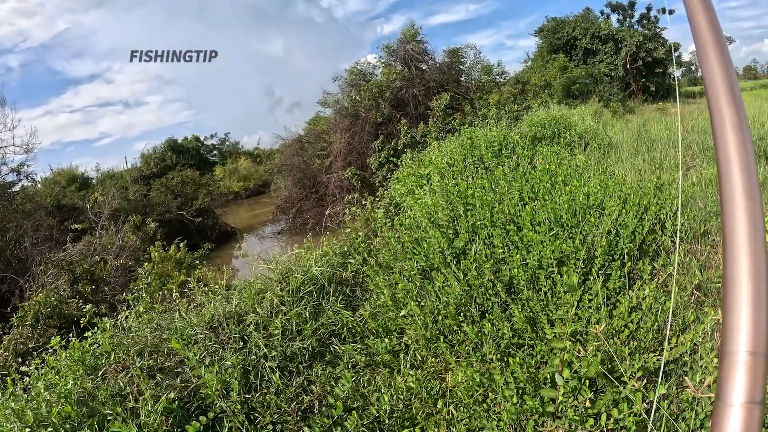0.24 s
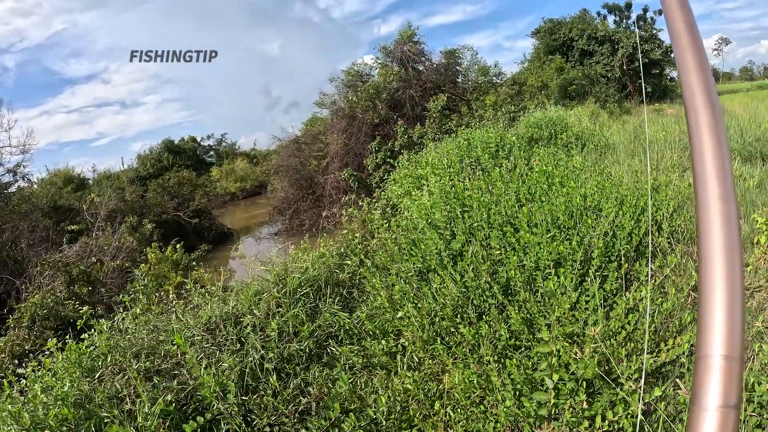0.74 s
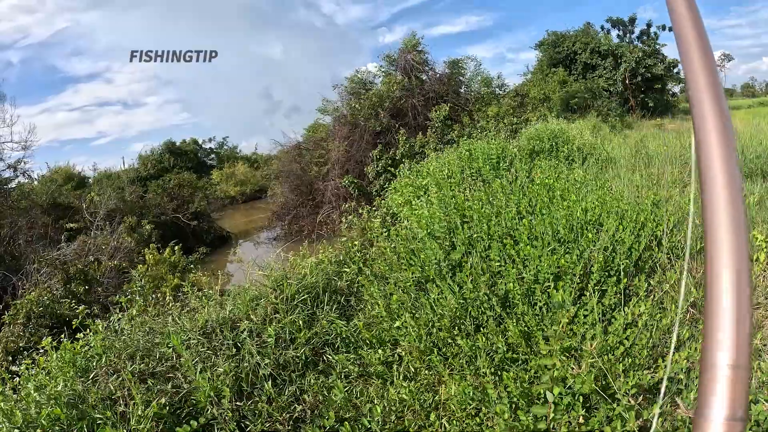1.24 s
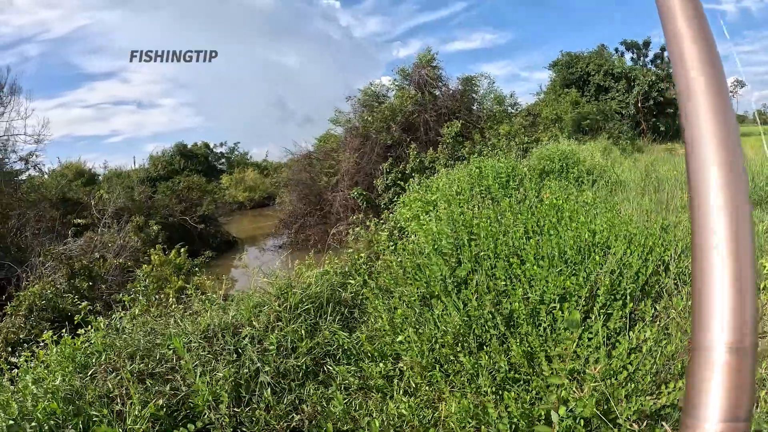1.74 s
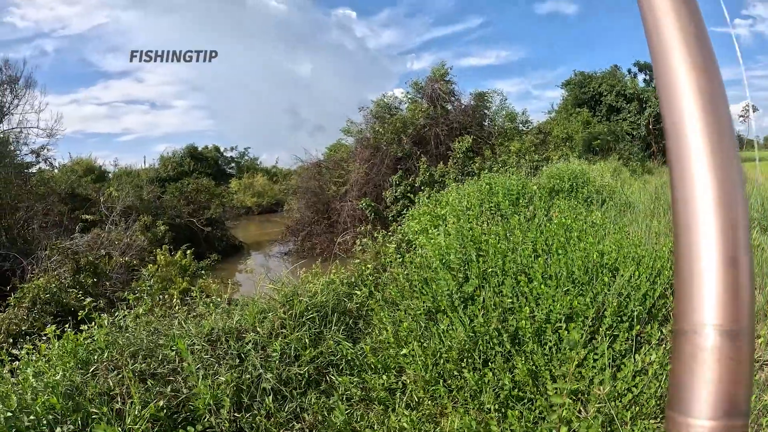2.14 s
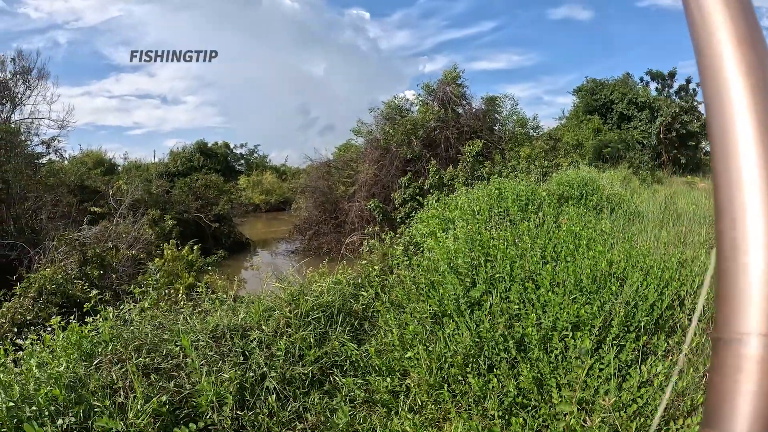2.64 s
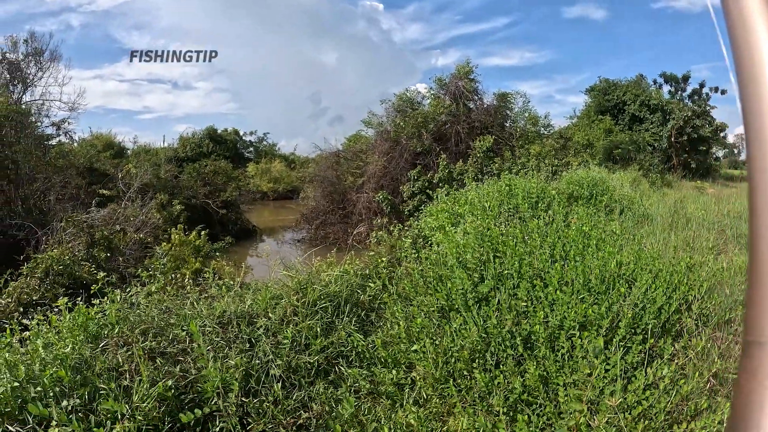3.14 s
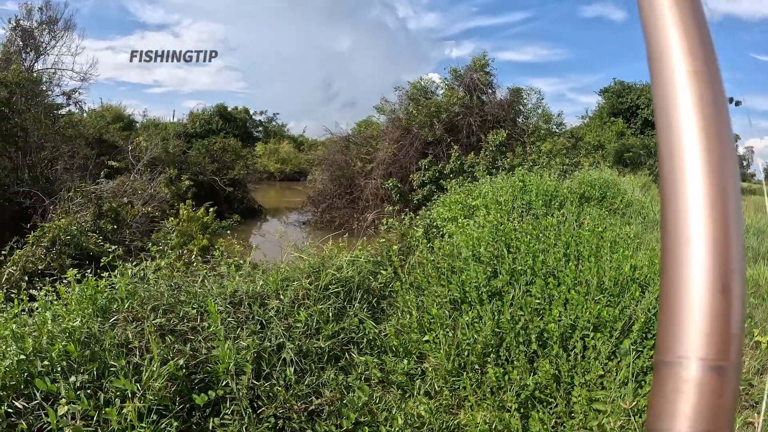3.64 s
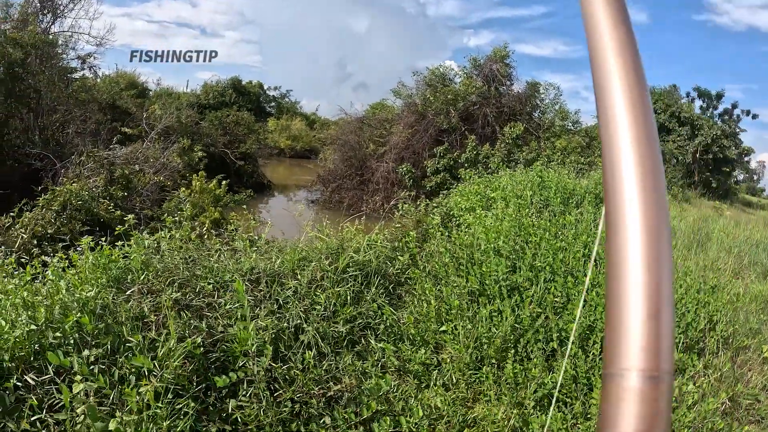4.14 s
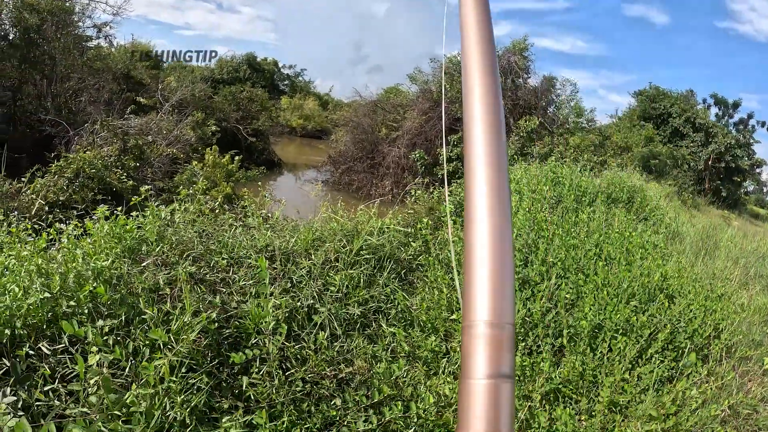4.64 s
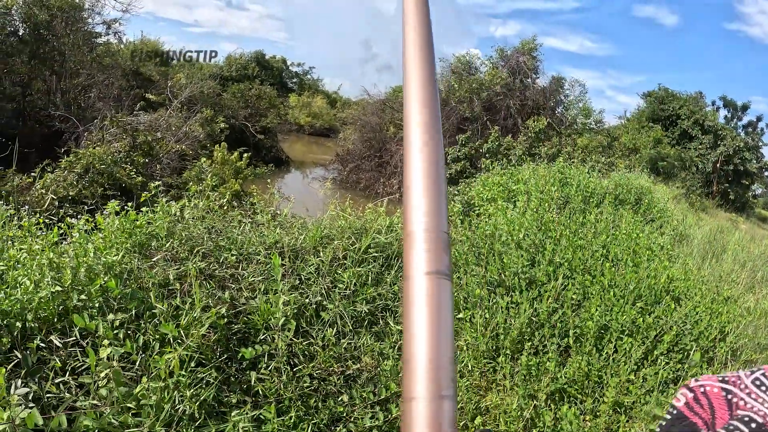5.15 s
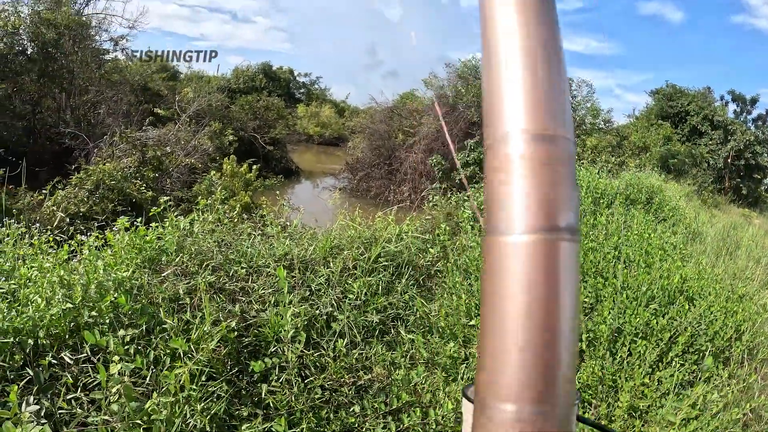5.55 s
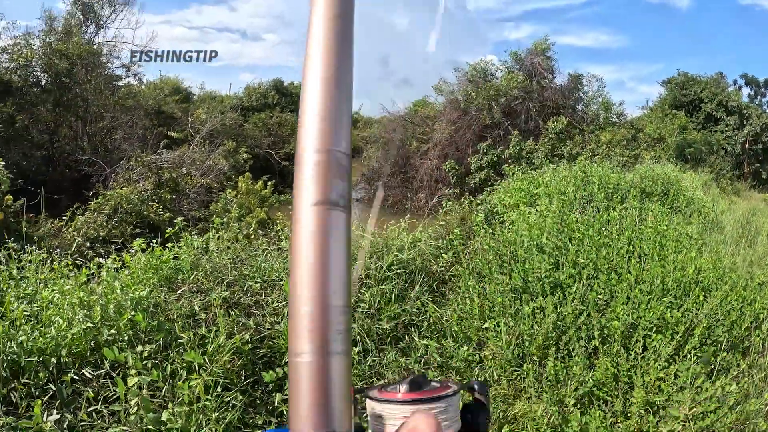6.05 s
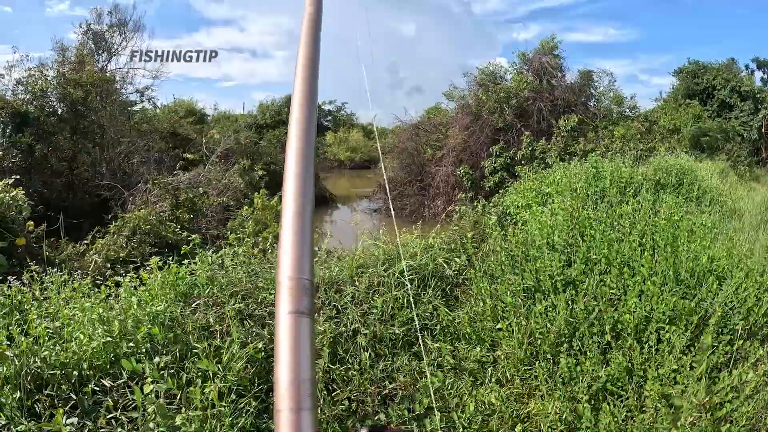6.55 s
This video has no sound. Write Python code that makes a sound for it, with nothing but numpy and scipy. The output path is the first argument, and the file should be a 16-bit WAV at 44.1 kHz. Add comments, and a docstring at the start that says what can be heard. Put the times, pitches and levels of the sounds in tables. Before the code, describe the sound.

Outdoors by a pond, close stereo microphone. Low wind rumbles and thumps, strongest near one and three seconds, above a faint wavering deep hum. A fishing reel hisses and whirrs unevenly, with dull knocks of rod and handle and one hard click at two seconds. From about 3.7 seconds bright metallic clicks come irregularly, several each second, to nearly five; then more scattered clacks, small squeaks and thin line scrapes.

```python
"""Beside a pond, a spinning reel is cranked close to two microphone ports. Far off a low hum wavers
(gliding partials); gusts of wind buffet the microphone (coloured noise, bandpassed lumps, short thumps).
Handle and rod knock, rubbing parts squeak and scrape, loose metal clicks and rattles (struck modes).
Line and bearings hiss (patchy noise); gears whirr in the housing (random tooth contacts through
drifting resonances)."""
import sys
import numpy as np
from scipy import signal
from scipy.fft import rfft, irfft
from scipy.io import wavfile
from scipy.ndimage import uniform_filter1d

SR = 44100
rng = np.random.default_rng(int(sys.argv[2]) if len(sys.argv) > 2 else 0)


def to_wav(sig):
    """Store sig (one row per channel, or 1-D mono) as 16-bit WAV at the path in sys.argv[1].

    Samples outside -1..1 are clipped; the rate is SR.
    """
    pcm = np.clip(np.atleast_2d(sig), -1, 1) * 32767
    pcm = np.round(pcm).astype(np.int16)
    wavfile.write(sys.argv[1], SR, pcm.T)  # frames by channels


N = 299439  # samples


def amp(db):
    """dB to amplitude ratio."""
    return 10 ** (np.asarray(db) / 20)


def evened(x):
    """Scale to rms 1."""
    return x / np.sqrt(np.mean(x ** 2) + 1e-20)


def columns(rows):
    """Every column of a time table, interpolated to one value a sample."""
    s, *rest = np.transpose(rows)
    return [np.interp(np.arange(N) / SR, s, c) for c in rest]


def read(points, hz):
    """A frequency table, interpolated over log frequency."""
    f, value = np.transpose(points)
    return np.interp(np.log(hz + 1), np.log(f + 1), value)


def coloured(x, spectrum):
    """Filter x by a spectral shape in dB, then scale to rms 1."""
    gain = amp(read(spectrum, np.fft.rfftfreq(len(x), 1 / SR)))
    return evened(irfft(rfft(x) * gain, len(x)))


def drift(top_hz):
    """Slow random modulation of rms 1, lowpassed at top_hz."""
    lowpass = signal.butter(2, top_hz, fs=SR, output="sos")
    return evened(signal.sosfilt(lowpass, rng.standard_normal(N)))


def resonate(x, hz, width_hz):
    """One resonance, fixed or gliding: shift hz down to zero, smooth, shift back."""
    turn = np.exp(2j * np.pi * np.cumsum(hz * np.ones(len(x))) / SR)
    r = np.exp(-np.pi * width_hz / SR)
    return 2 * (turn * signal.lfilter([1 - r], [1, -r], x / turn)).real


def add(mix, s, sound):
    """Mix sound in at time s, cut at the end."""
    part = mix[round(s * SR):][:len(sound)]
    part += sound[:len(part)]


def ring(modes, centre_hz, octaves, luck):
    """Struck modes, strongest near centre_hz; each blow gives them random strengths and signs."""
    hz, db, t60_s = np.transpose(modes)[:, :, None]
    t = np.arange(3000) / SR
    near_db = -6 * (np.log2(hz / centre_hz) / max(octaves, .1)) ** 2
    mode_luck = luck[:len(hz), None]
    share = np.sign(mode_luck) * amp(-6 * np.exp(-mode_luck ** 2))
    envelope = amp(db + np.maximum(near_db, -17) - 60 * t / t60_s)
    return (share * envelope * np.sin(2 * np.pi * hz * t)).sum(0)


# hum pitch before its jitter: [t/s, f/Hz]
HUM_PITCH = [(0, 56.55), (.38, 56.43), (.55, 62.3), (1.05, 59.4), (1.3, 62.4), (1.6, 55.2), (1.95, 57.06),
             (2.2, 55.05), (2.5, 62.4), (2.9, 57.73), (3.3, 63.08), (3.75, 53.75), (4.1, 56.34),
             (4.4, 55.57), (4.6, 58.9), (5.5, 58.85), (5.75, 54.75), (6.3, 56.9), (6.45, 61.44),
             (6.79, 58.66)]


def hum():
    """A wavering tone; two fixed resonances lift its octave and fourth partial as they pass."""
    hz = columns(HUM_PITCH)[0]
    phase = 2 * np.pi * np.cumsum(hz + 0.28 * drift(7.3)) / SR
    octave_db = -14 - 6 * np.tanh(((2 * hz - 125) / 9) ** 2) + 5.9 * drift(8.6)
    fourth_db = -16 - 12 * np.tanh(((4 * hz - 227) / 7) ** 2) + 1.0 * drift(13.0)
    octave = amp(octave_db) * np.cos(2 * phase + 1)
    fourth = amp(fourth_db) * np.cos(4 * phase)
    return amp(-19.0 + 0.79 * drift(13.0)) * (np.cos(phase) + octave + fourth)


# wind between gusts: [t/s, buffeting level/dB, deep push level/dB]
STEADY_WIND = [(0, -26.5, -41), (.5, -31, -66), (1.4, -28.5, -33), (2.2, -29.5, -23.5), (3.1, -29, -25.5),
               (3.8, -32, -33), (3.95, -29.5, -32), (4.9, -33, -33), (5.6, -32, -53), (6.4, -30, -53),
               (6.79, -31, -34)]
# gusts: [t/s, buffeting level/dB, deep push level/dB]
WIND_GUSTS = [(.75, -25.5, -22), (1.04, -17.5, -40), (2.21, -19.5, -40), (2.27, -50, -21.5),
              (2.91, -11.5, -28), (3.05, -19, -23), (3.6, -23, -31), (3.84, -24, -17.5), (4.971, -19, -39),
              (5.09, -20, -45), (5.45, -43, -22.5), (5.94, -21.5, -45), (6.38, -24, -42)]
GUST_RISE_S, GUST_FALL_S = 0.048, 0.066  # 1/e times of amplitude


def gusting():
    """Buffeting and deep push: steady wind plus a quick rise and fall of pressure at each gust."""
    power = amp(columns(STEADY_WIND)) ** 2
    for s, *dbs in WIND_GUSTS:
        t = np.arange(N) / SR - s
        decay = np.where(t < 0, -t / GUST_RISE_S, t / GUST_FALL_S)
        power = power + amp(dbs)[:, None] ** 2 * np.exp(-2 * decay)
    return np.sqrt(power)


# spectral shape of the deep push: [f/Hz, relative level per Hz/dB]
PUSH_SHAPE = [(8, -79), (25, 5.5), (55, 10), (90, -46), (300, -120)]
# spectral shape of the buffeting: [f/Hz, relative level per Hz/dB]
BUFFET_SHAPE = [(41, -8), (70, -10.5), (87, -3), (189, -14), (227, -15), (445, -43), (700, -40),
                (910, -104), (1540, -120)]
# sudden buffets: [t/s, relative peak level/dB, f/Hz]
SUDDEN_BUFFETS = [(0.697, -7, 63.3), (1.003, -6, 138), (1.419, -2, 54.5), (1.533, -7, 58),
                  (2.191, -12, 58.1), (2.242, -3.5, 40.54), (2.536, -4, 52.8), (2.623, -10.5, 83.06),
                  (2.885, -11, 59.2), (2.972, 1.5, 73), (3.064, -1, 40.98), (3.523, -0.5, 55),
                  (3.597, -5, 43.36), (3.83, -4, 42.4), (4.964, -8, 83), (6.369, -11.5, 104)]


def wind():
    """Lumpy low pressure noise and sudden buffets, a little unlike at the two ports."""
    a, b, c, d = rng.standard_normal((4, N))
    buffet, push = gusting()
    buffet = buffet * amp(1.09 * drift(14.4))
    both = push * coloured(a, PUSH_SHAPE) + buffet * coloured(b, BUFFET_SHAPE)
    noises = rng.standard_normal((len(SUDDEN_BUFFETS), 9000))
    for (s, db, hz), lump in zip(SUDDEN_BUFFETS, noises):
        for _ in range(3):
            lump = resonate(lump, hz, 79)
        lump = lump[-2200:] * np.hanning(2200)
        add(both, s, amp(db - 7.0) * lump / abs(lump).max())
    unlike_push = 0.2 * push * coloured(c, PUSH_SHAPE)
    unlike_buffet = 0.096 * buffet * coloured(np.diff(d, prepend=0), BUFFET_SHAPE)
    return both + np.array([[1], [-1]]) * (unlike_push + unlike_buffet)


# short sharp wind buffets: [t/s, peak level/dB, f/Hz]
SHORT_THUMPS = [(1.008, -27, 196), (1.037, -20, 181), (1.284, -28, 260), (2.885, -21, 201),
                (2.913, -26, 189), (2.961, -20, 207), (2.981, -11, 220), (3.07, -17, 198),
                (3.154, -15, 175), (4.967, -21, 201)]
THUMP_CYCLES = 1.79


def thumps():
    """Short sharp low thumps: a couple of cycles under a sine-squared window."""
    out = np.zeros(N)
    for s, db, hz in SHORT_THUMPS:
        u = np.arange(0, 1, hz / THUMP_CYCLES / SR)
        push = np.sin(np.pi * u) ** 2 * np.cos(2 * np.pi * THUMP_CYCLES * (u - .5))
        add(out, s, amp(db) * push)
    return out


# brief squeaks: [t/s, length/s, f/Hz, level before envelope/dB, width of each resonance pass/Hz]
RUB_SQUEAKS = [(1.012, .07, 3640, -41, 60), (1.012, .05, 750, -36, 60), (1.0, .08, 350, -36, 60),
               (1.015, .04, 2050, -41, 50), (1.88, .05, 3550, -39, 250), (1.98, .04, 4500, -35, 200),
               (2.075, .045, 4220, -35, 250), (5.24, .17, 2400, -33, 150), (6.52, .15, 3760, -39, 100),
               (2.71, .08, 3220, -41, 120)]


def squeaks():
    """Rubbing noise narrowed to a short fuzzy whistle."""
    out = np.zeros(N)
    noises = rng.standard_normal((len(RUB_SQUEAKS), 12000))
    for (s, length_s, hz, db, width_hz), noise in zip(RUB_SQUEAKS, noises):
        tone = resonate(resonate(noise, hz, width_hz), hz, width_hz)[-int(length_s * SR):]
        envelope = np.sin(np.pi * np.linspace(0, 1, len(tone)) ** 0.66) ** 0.7
        add(out, s, amp(db) * evened(tone) * envelope)
    return out


# bright scrapes of the line: [t/s, length/s, f/Hz, level before envelope/dB]
LINE_SCRAPES = [(5.119, 0.05, 7490, -42), (5.798, 0.089, 7200, -39), (5.896, 0.05, 6940, -40),
                (6.14, 0.072, 5630, -43), (6.286, 0.048, 4740, -45), (6.327, 0.049, 7300, -42),
                (6.509, .04, 5830, -42), (6.59, 0.084, 7235, -39), (6.69, 0.074, 7400, -39)]
SCRAPE_WIDTH_HZ = 1900  # each pass


def scrapes():
    """Uneven grains of rubbing in a wide bright band."""
    out = np.zeros(N)
    draws = rng.standard_normal((len(LINE_SCRAPES), 2, 6000))
    for (s, length_s, hz, db), (noise, luck) in zip(LINE_SCRAPES, draws):
        band = noise * amp(32 * uniform_filter1d(luck, size=30))
        for _ in range(2):
            band = resonate(band, hz, SCRAPE_WIDTH_HZ)
        band = band[-int(length_s * SR):]
        add(out, s, amp(db) * evened(band) * np.sin(np.linspace(0, np.pi, len(band))))
    return out


# dull knocks of handle and rod: [t/s, relative peak level/dB, strongest f/Hz]
DULL_KNOCKS = [(0.881, -25.5, 1700), (1.013, -36, 1280), (1.072, -24, 1500), (1.286, -26, 1380),
               (1.341, -24, 1490), (1.674, -26.5, 1390), (1.925, -24, 1137), (2.003, -21.5, 1530),
               (2.022, -21.5, 1440), (2.963, -22.5, 1522), (3.137, -26, 1086), (3.244, -25.5, 790),
               (3.591, -26, 1600), (4.079, -25.5, 1460), (4.229, -26, 1393), (4.971, -24, 1280),
               (5.843, -23, 860), (6.281, -25.5, 922)]
# plastic modes: [f/Hz, relative level/dB, t60/s]
PLASTIC_MODES = [(666, 7, 0.098), (760, -1.5, 0.18), (976, 7, 0.071), (1130, 2, 0.02), (1444, 19.5, 0.01),
                 (1947, 6, 0.049)]


def knocks():
    """Soft blows, rounded over 12 samples, on the plastic modes."""
    out = np.zeros(N)
    for (s, db, hz), luck in zip(DULL_KNOCKS, rng.standard_normal((len(DULL_KNOCKS), 8))):
        sound = np.convolve(ring(PLASTIC_MODES, hz, 0.78, luck), np.hanning(12))
        add(out, s, amp(db + 4.5) * sound / abs(sound).max())
    return out


# loose metal, often a bright tick then a duller clack: [t/s, relative peak level/dB, strongest f/Hz]
METAL_CLICKS = [(0.1022, -22.5, 2960), (0.88, -20, 3260), (1.011, -26, 3000), (2.0019, -12, 3420),
                (2.964, -25, 3140), (3.7034, -20, 4930), (3.709, -10.5, 4000), (3.8264, -11, 6420),
                (3.867, -30, 5200), (3.958, -11, 6264), (4.0609, -11.5, 6640), (4.067, -10, 4000),
                (4.1956, -23, 8720), (4.2024, -11, 4940), (4.2305, -18, 3172), (4.3021, -8, 5630),
                (4.421, -19, 5800), (4.4297, -11.5, 4620), (4.5637, -14, 5530), (4.6601, -9, 7820),
                (4.6626, -16, 5830), (4.7736, -13.5, 8650), (4.778, -14, 3380), (4.872, -5.5, 6600),
                (4.876, -12, 3566), (4.976, -10.5, 6650), (4.982, -16, 3104), (5.149, -20, 3620),
                (5.5538, -17, 3210), (5.842, -21, 7390), (5.95, -20, 6400), (5.971, -13, 3826),
                (6.017, -11.5, 3153), (6.124, -16.5, 6130), (6.137, -22, 5740), (6.19, -17, 3180),
                (6.1965, -6.5, 5840), (6.213, -21, 3130), (6.281, -10, 3500), (6.3065, -22, 4560),
                (6.755, -15, 3237)]
# metal modes: [f/Hz, relative level/dB, t60/s]
METAL_MODES = [(2860, 9, 0.0028), (3470, -1.5, 0.0081), (4040, 8.5, 0.0026), (4730, -10.5, 0.017),
               (5060, 2.5, 0.004), (5820, 2, 0.011), (6460, 5, 0.0041), (6860, 16.5, 0.00099),
               (8220, -1.5, 0.0049), (9120, 3, 0.0064), (10700, -17.5, 0.0028), (11800, 0.5, 0.0043)]
RATTLE_S = 0.0044


def clicks():
    """A tick and a short rattle of blows, then a duller noisy tail, all on the metal modes."""
    out, t = np.zeros(N), np.arange(1800) / SR
    lucks = rng.standard_normal((len(METAL_CLICKS), 1820))
    for (s, db, hz), luck in zip(METAL_CLICKS, lucks):
        sparse = abs(luck[:1800]) > 1.7
        blows = luck[20:] * 0.5 * sparse * np.exp(-(t / RATTLE_S) ** 2)
        blows[:30] *= .2
        blows[30] = .75  # the tick
        body = ring(METAL_MODES, hz, 0.82, luck)
        # bare contact, sharper for bright blows
        body[:3] += .5 * (hz / 6000) ** 2 * np.array([1, -2, 1])
        tail = luck[20:] * amp(-21.5 - 60 * t / 0.053) * np.minimum(t / RATTLE_S, 1)
        duller = ring(METAL_MODES, 0.7 * hz, 1.0, luck)
        sound = signal.fftconvolve(body, blows) + signal.fftconvolve(duller, tail)
        add(out, s, amp(db - 2.5) * sound / abs(sound).max())
    return out


# hiss of line and bearings: [t/s, relative level/dB]
SWISH_LEVEL = [(0.0, -46.5), (0.3, -54), (0.76, -48.5), (2.06, -43), (2.65, -41.5), (3.52, -46),
               (4.65, -47), (5.11, -41), (5.56, -46.5), (5.9, -42), (6.37, -39), (6.79, -44)]
# spectral shape of the hiss: [f/Hz, relative level per Hz/dB]
SWISH_SHAPE = [(180, -12), (300, -7), (461, -7.5), (1160, -2.5), (1280, 0), (2230, -4), (2830, -6),
               (3070, -4), (4800, -9.5), (5650, -10), (8900, -16), (10100, -28), (12200, -25.5),
               (13500, -35), (15500, -70)]
# rotor speed: [t/s, turns per s/Hz]
ROTOR_SPEED = [(0, 9.8), (.85, 13.6), (1.5, 18.4), (2.2, 27.4), (3.6, 23.6), (6.79, 16)]
SWELL_DB = -0.03  # too small to hear


def swish():
    """Broad patchy hiss with fine grit, nearly steady."""
    swell = np.cos(2 * np.pi * np.cumsum(columns(ROTOR_SPEED)[0]) / SR + 1.45)
    grit = amp(4.0 * np.minimum(rng.exponential(1, N), 3.5)) * (rng.random(N) < 400 / SR)
    gritty = coloured(rng.standard_normal(N) * (1 + 2.37 * grit), SWISH_SHAPE)
    z = signal.stft(gritty, nperseg=256)[2]
    patches = uniform_filter1d(rng.standard_normal(z.shape), size=9, axis=1)
    patches = uniform_filter1d(patches, size=5, axis=0)
    hiss = signal.istft(z * amp(2.64 * evened(patches)), nperseg=256)[1][:N]
    level_db = columns(SWISH_LEVEL)[0] + 6.0 + SWELL_DB * swell + 1.0 * drift(25)
    return amp(level_db) * evened(hiss)


# jolts of the crank: [t/s, tail/s, grind change/dB, whine change/dB, swish change/dB]
CRANK_JOLTS = [(.85, 0.051, -4, 7.5, -1.5), (1.018, 0.048, 9.5, 11.5, 2), (1.2, 0.21, 2.5, 1.5, 0),
               (5.16, 0.085, 8.5, 1, 1), (5.53, 0.086, 6.5, 12.5, 3.5)]
JOLT_RISE = 0.47  # share of the tail


def jolts():
    """Brief level changes of grind, whine and swish, in dB: quick onset, slower return."""
    t = np.arange(N) / SR
    total_db = 0
    for s, tail_s, *change_db in CRANK_JOLTS:
        width_s = np.where(t < s, JOLT_RISE * tail_s, tail_s)
        total_db = total_db + np.array(change_db)[:, None] * np.exp(-((t - s) / width_s) ** 2)
    return total_db


# low gear grind, lower while a stroke of the spool loads the gears:
# [t/s, relative level/dB, f of the ringing housing region/Hz]
GEAR_GRIND = [(0, -51, 1280), (.3, -49, 1770), (.62, -41, 1290), (1.3, -40, 1269), (1.48, -47.5, 1590),
              (1.8, -36, 1290), (2.25, -35, 1280), (2.56, -41, 1520), (2.72, -36, 1340),
              (2.88, -29.5, 1185), (3.24, -41.5, 1279), (3.42, -51, 1520), (3.85, -40, 1288),
              (4.3, -41.5, 1314), (4.75, -48.5, 1560), (5.0, -33.5, 1295), (5.5, -44, 1320),
              (5.68, -46.5, 1504), (6.1, -36, 1286), (6.79, -37, 1673)]
# high gear whine: [t/s, relative level/dB, f of the ringing housing region/Hz]
GEAR_WHINE = [(0, -43, 2630), (.24, -52, 2940), (.65, -49.5, 2700), (1.12, -43.5, 2700), (1.45, -37, 3000),
              (1.64, -34, 2812), (1.87, -35, 3250), (2.1, -39.5, 2981), (2.75, -40.5, 2870),
              (3.4, -40.5, 2753), (4.5, -46, 2770), (4.65, -36.5, 3384), (5.05, -48, 3013),
              (5.24, -35.5, 3402), (5.42, -40, 3470), (5.57, -42, 3110), (5.7, -44, 3032),
              (6.25, -59, 3142), (6.4, -31.5, 3360), (6.5, -41, 3200), (6.62, -35, 3730), (6.79, -34, 3007)]
# housing modes under the grind: [f/Hz, width of each pass/Hz, relative level/dB]
GRIND_MODES = [(1130, 170, 4), (1303, 206, 3), (1550, 160, 3), (1767, 240, -5)]
# housing modes under the whine: [f/Hz, width of each pass/Hz, relative level/dB]
WHINE_MODES = [(2639, 78, 8), (2825, 220, 6), (3153, 200, 5.5), (3590, 86, 10.5), (3810, 110, 8)]


def gears(jolts_db):
    """Uneven tooth contacts ring housing modes near a moving region, a wide skirt and a broken strand."""
    out = 0
    # (curve, modes, reach/octaves, skirt width/Hz, skirt level/dB)
    layers = ((columns(GEAR_GRIND), GRIND_MODES, .18, 900, -7),
              (columns(GEAR_WHINE), WHINE_MODES, .22, 1300, -7))
    for ((db, hz), modes, reach, skirt_hz, skirt_db), jolt_db in zip(layers, jolts_db):
        strength = amp(0.45 * np.minimum(rng.exponential(1, N), 5))  # a few contacts are hard
        contact = rng.random(N) < 2500 / SR
        teeth = strength * contact * rng.standard_normal(N)

        def twice(f, width_hz):
            """Tooth noise through two equal resonances."""
            return evened(resonate(resonate(teeth, f, width_hz), f, width_hz))

        core, power = 0, 0
        for f, width_hz, mode_db in modes:
            away = np.tanh((np.log2(f / hz) / reach) ** 2)
            gain = amp(mode_db - 4.6 * away + 3.2 * drift(9.3))
            pulled_hz = f * (hz / f) ** 0.22 * (1 + 0.012 * drift(9.5))  # drawn towards the region
            core = core + gain * twice(pulled_hz, width_hz)
            power = power + gain ** 2
        core = core / uniform_filter1d(np.sqrt(power), size=6000)  # leaves loudness to the curve
        skirt = amp(skirt_db) * twice(hz, skirt_hz)
        strand = amp(-2.5 + 3.3 * drift(16)) * twice(hz * (1 + 0.017 * drift(6.0)), 160)
        out = out + amp(db + jolt_db - 5.5 + 1.17 * drift(21)) * (core + skirt + strand)
    return out


# likeness of the ports: [f/Hz, likeness 0-1]
LIKENESS = [(60, 1), (150, 1), (360, 0.69), (880, 0.86), (2170, 0.79), (5310, 0.88), (9000, 1),
            (13000, 0.47)]
# port balance: [f/Hz, left-right level/dB]
BALANCE = [(60, 0.34), (230, -0.9), (880, 1.0), (3390, -1.2), (13000, 0.59)]
# port phase: [f/Hz, left lead/rad]
LEFT_LEAD = [(100, -.2), (430, .2), (1640, -.5), (3450, -1.0), (4570, -.3), (8610, 0), (13200, .4)]
# slow turn of the ports: [t/s, left-right level/dB]
PORT_TURN = [(0, -0.5), (.6, 0), (1.8, -1), (2.7, -1.5), (3.6, -1.5), (4.2, 0), (6.79, 0)]


def ports(near, low):
    """Two ports: a shared part shifted in phase, and near sound partly unlike, with random phase."""
    hz, side = np.fft.rfftfreq(N, 1 / SR), np.array([[1], [-1]])
    z = signal.stft(near, nperseg=512, noverlap=384)[2]
    random_phase = np.exp(2j * np.pi * rng.random(z.shape))
    unlike = signal.istft(z * random_phase, nperseg=512, noverlap=384)[1][:N]
    same = np.clip(read(LIKENESS, hz), 0, 1)
    shared = rfft(near + low) * np.sqrt((1 + same) / 2)
    apart = 2 * rfft(unlike) * np.sqrt((1 - same) / 2)
    tilt = amp(side * read(BALANCE, hz) / 2) * np.exp(.5j * side * read(LEFT_LEAD, hz))
    return amp(side * columns(PORT_TURN)[0] / 2) * irfft(tilt * (shared + side * apart), N)


def scene():
    """The reel near the ports, over hum, wind and short thumps."""
    *gear_db, swish_db = jolts()
    reel = gears(gear_db) + amp(swish_db) * swish() + clicks() + knocks() + squeaks() + scrapes()
    return ports(reel, hum() + wind() + thumps())


EDGE_HZ = 15500


def record(dry):
    """The microphone fades in the top octave; then the band limit."""
    dulled = signal.sosfilt(signal.butter(4, 13600, fs=SR, output="sos"), dry)
    band_limit = signal.firwin(511, EDGE_HZ, window=("kaiser", 9), fs=SR)
    return signal.oaconvolve(dulled, band_limit[None], "same")


dry = scene()
out = record(dry)
to_wav(out)
```